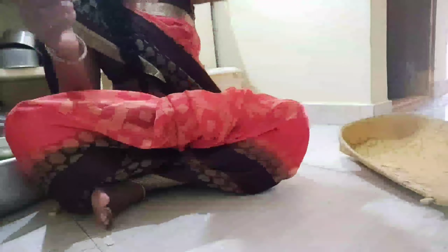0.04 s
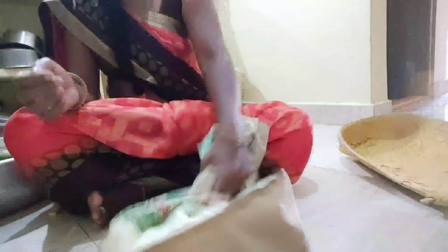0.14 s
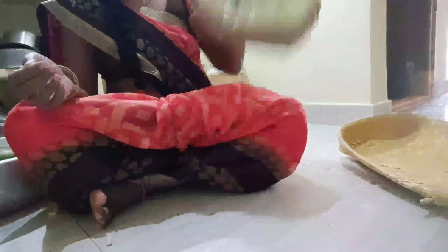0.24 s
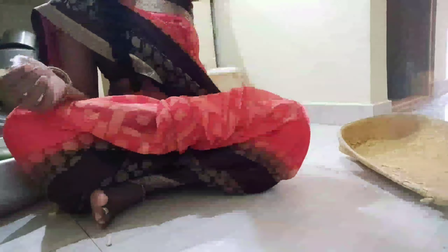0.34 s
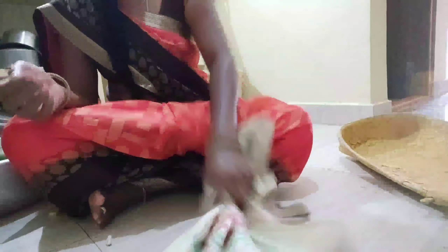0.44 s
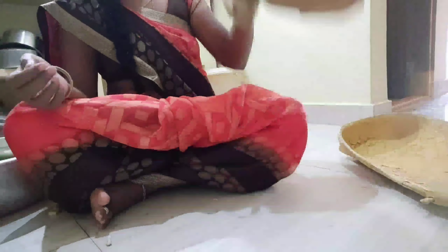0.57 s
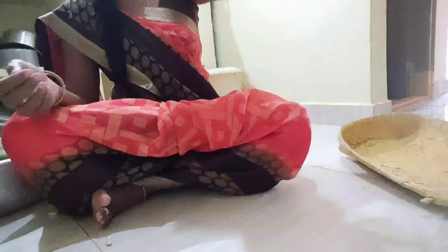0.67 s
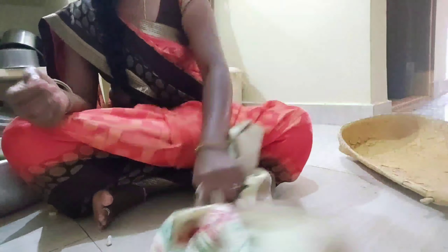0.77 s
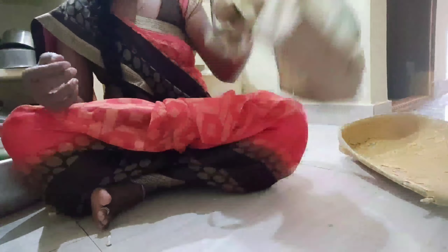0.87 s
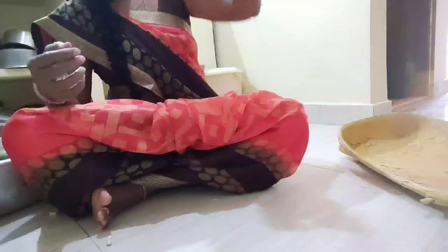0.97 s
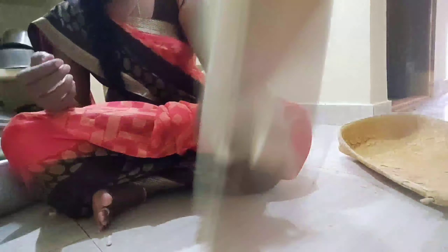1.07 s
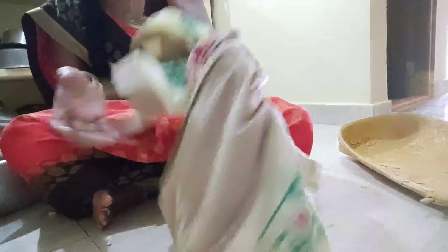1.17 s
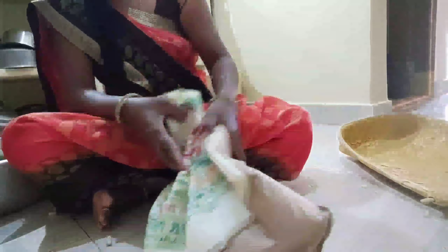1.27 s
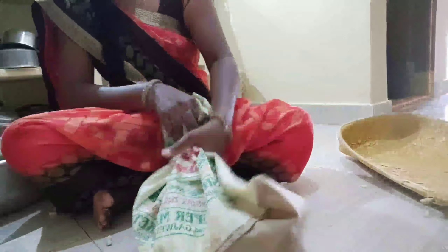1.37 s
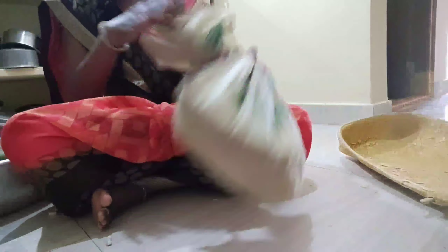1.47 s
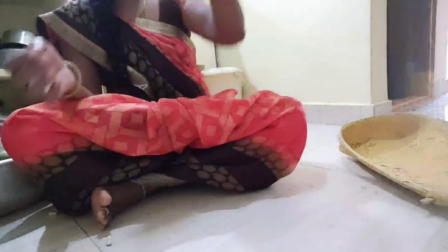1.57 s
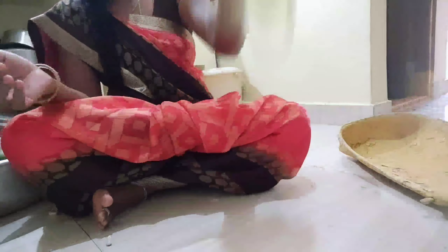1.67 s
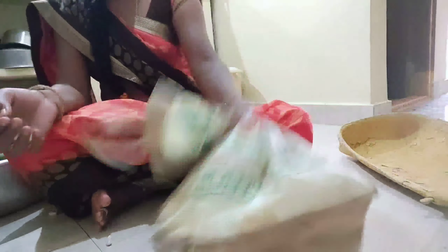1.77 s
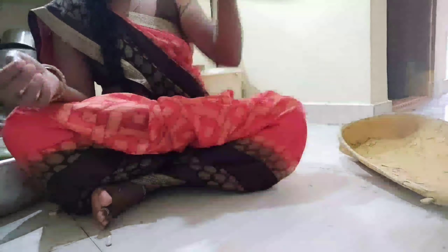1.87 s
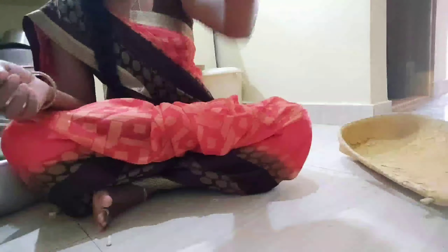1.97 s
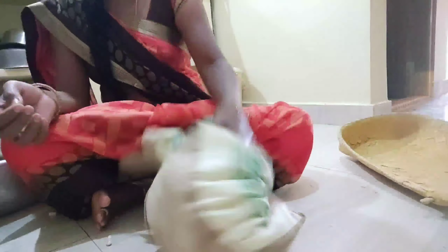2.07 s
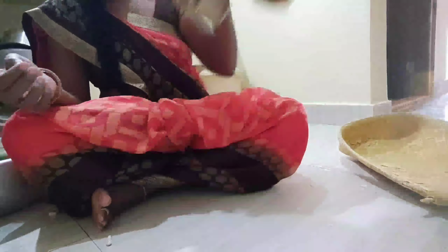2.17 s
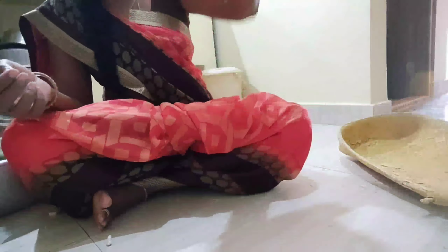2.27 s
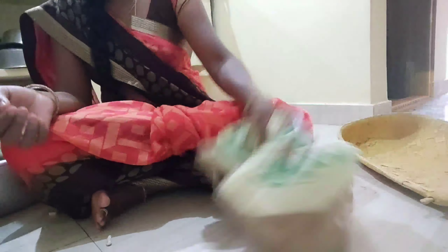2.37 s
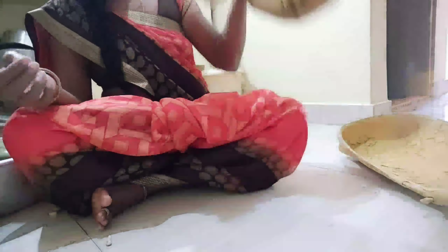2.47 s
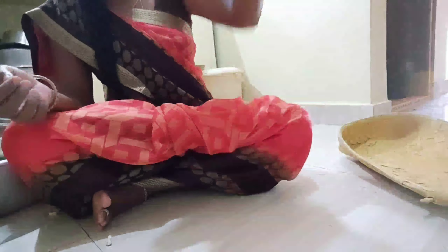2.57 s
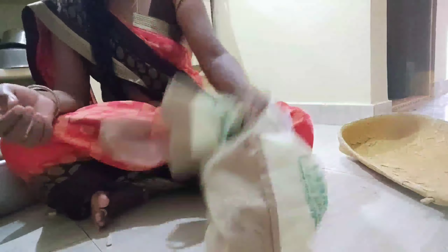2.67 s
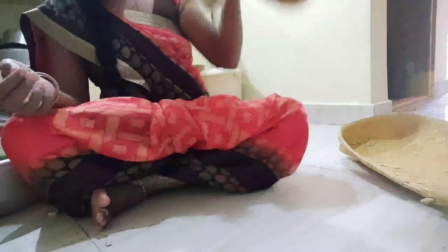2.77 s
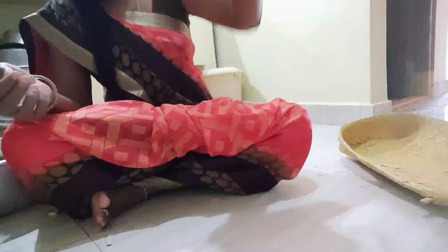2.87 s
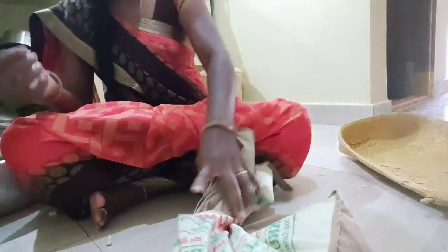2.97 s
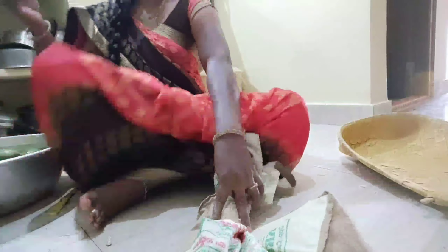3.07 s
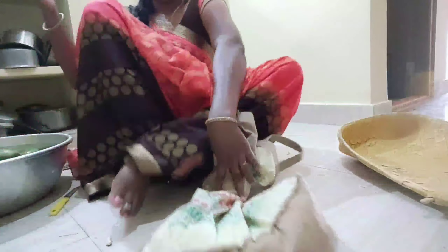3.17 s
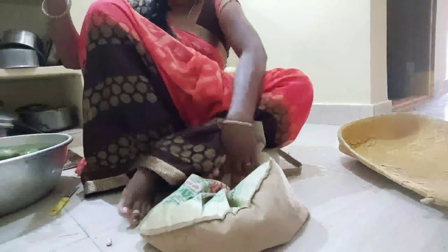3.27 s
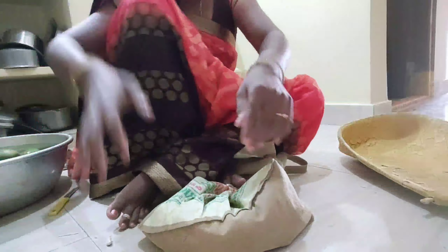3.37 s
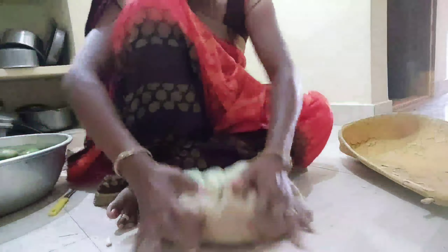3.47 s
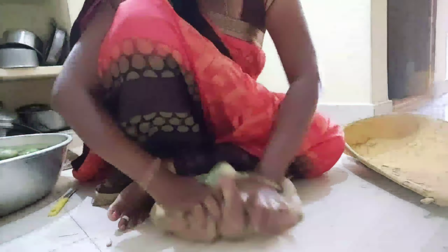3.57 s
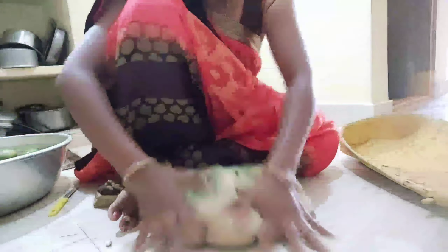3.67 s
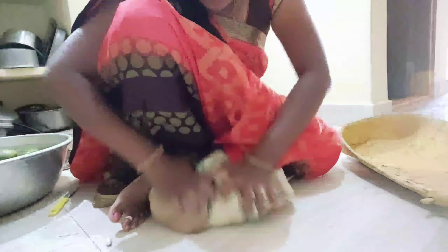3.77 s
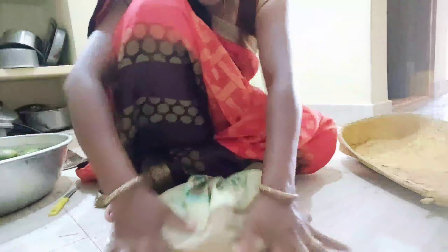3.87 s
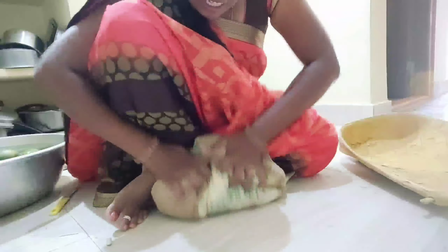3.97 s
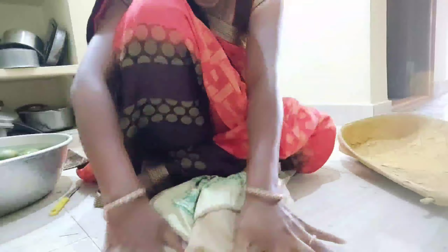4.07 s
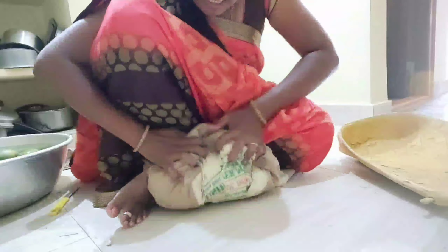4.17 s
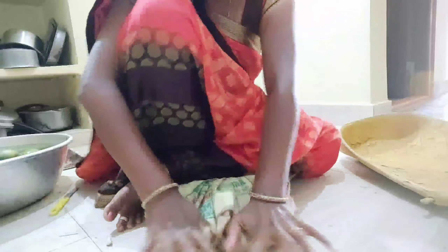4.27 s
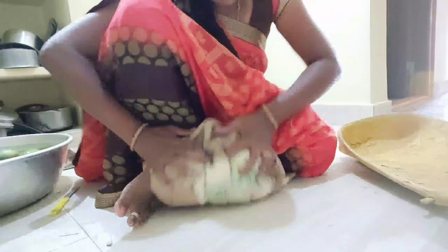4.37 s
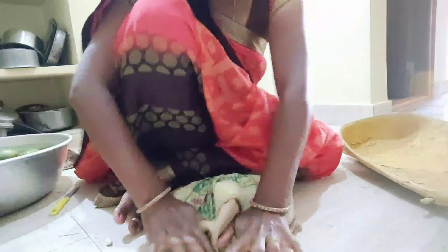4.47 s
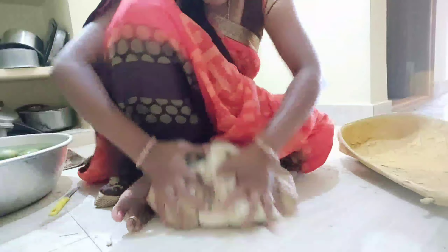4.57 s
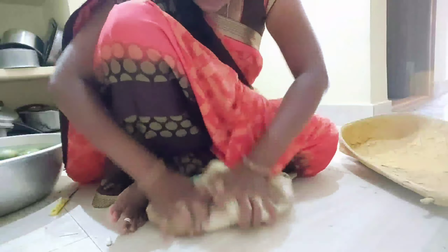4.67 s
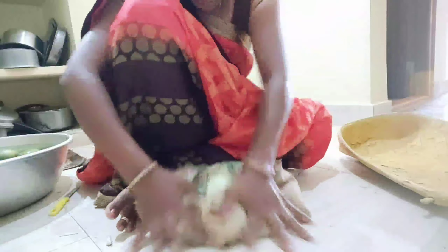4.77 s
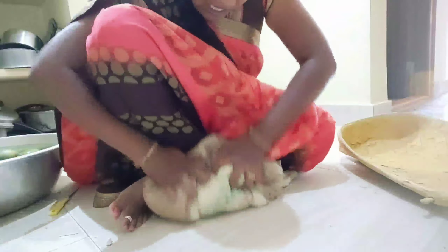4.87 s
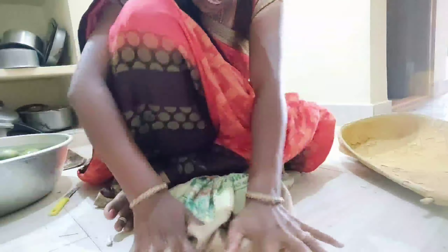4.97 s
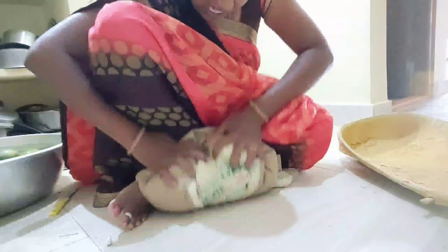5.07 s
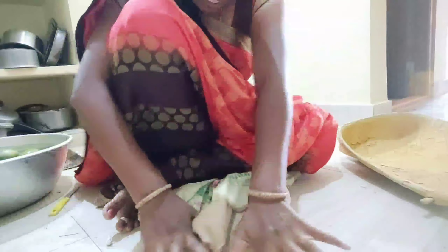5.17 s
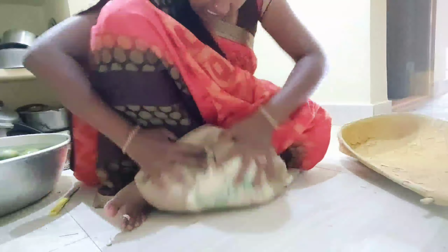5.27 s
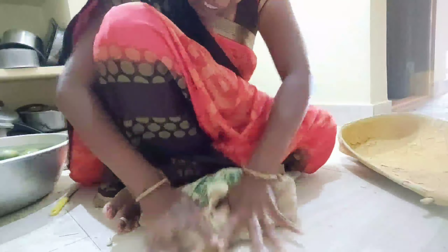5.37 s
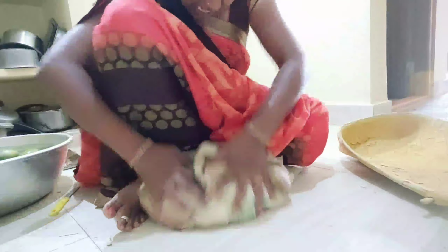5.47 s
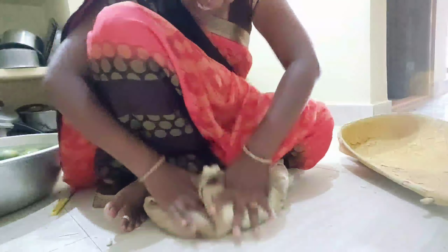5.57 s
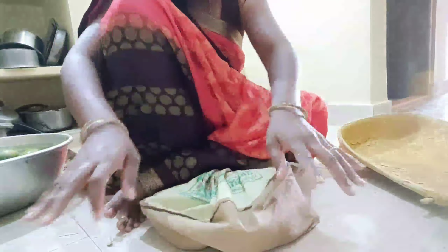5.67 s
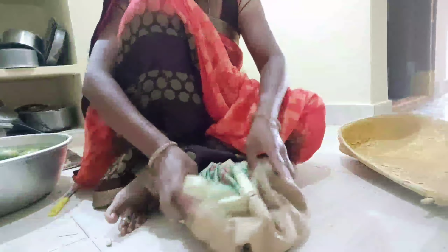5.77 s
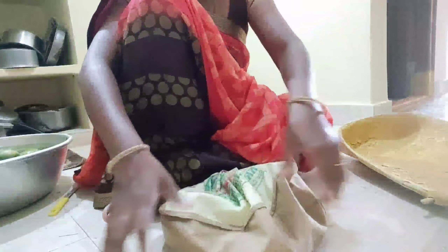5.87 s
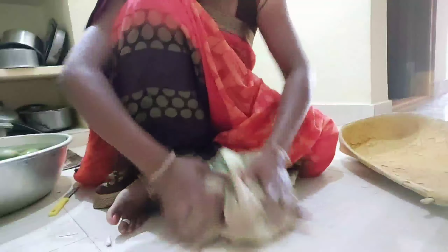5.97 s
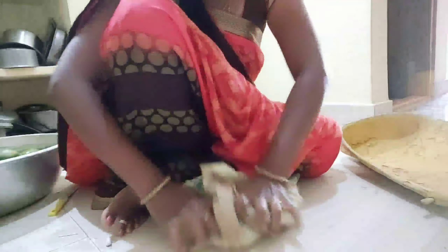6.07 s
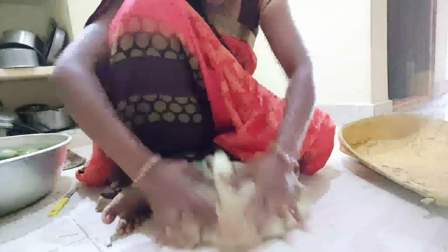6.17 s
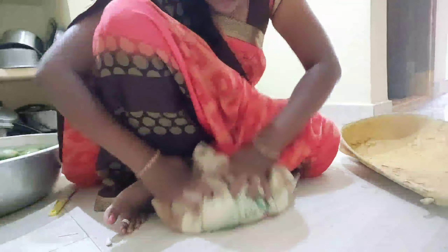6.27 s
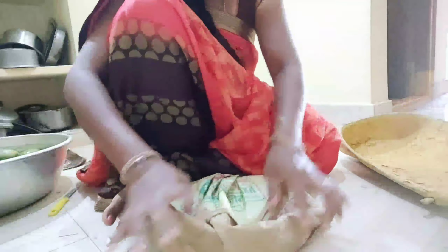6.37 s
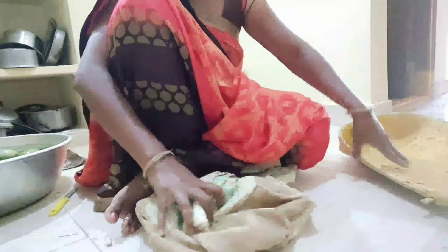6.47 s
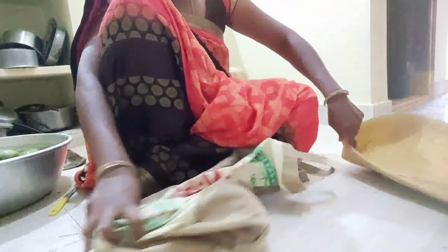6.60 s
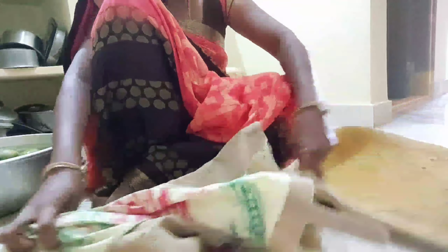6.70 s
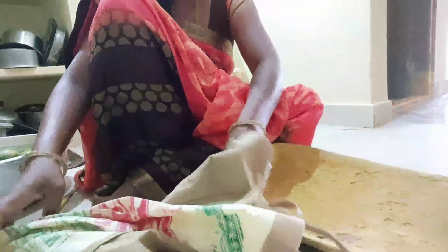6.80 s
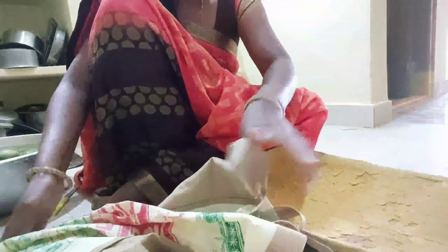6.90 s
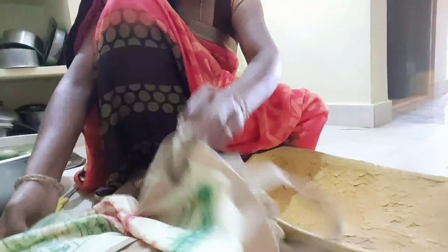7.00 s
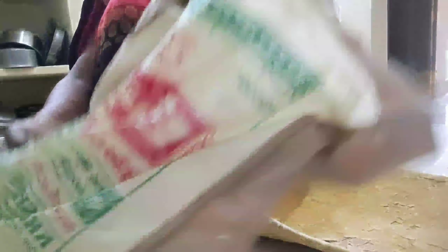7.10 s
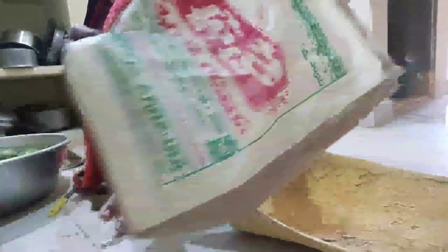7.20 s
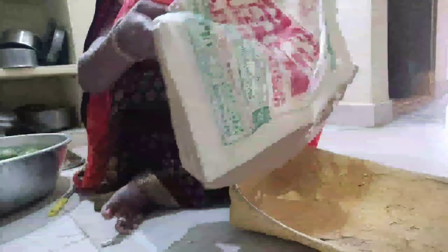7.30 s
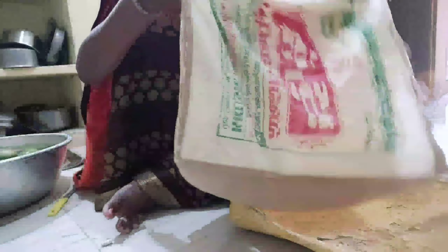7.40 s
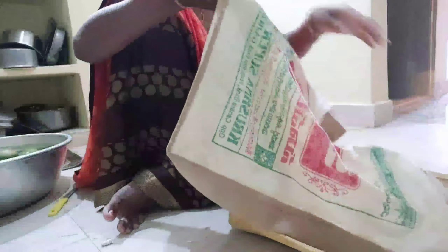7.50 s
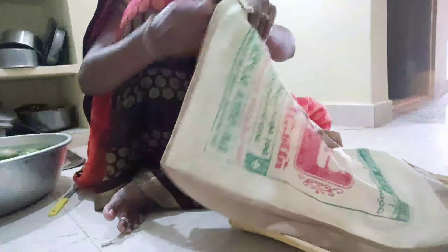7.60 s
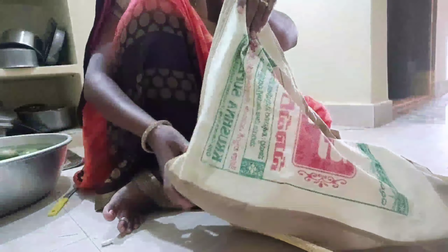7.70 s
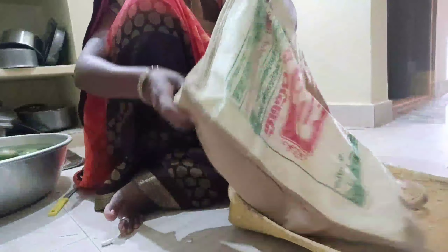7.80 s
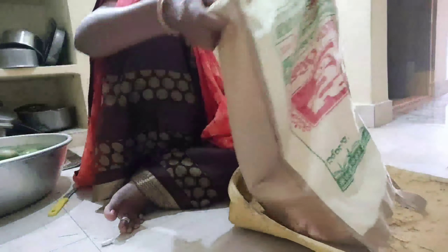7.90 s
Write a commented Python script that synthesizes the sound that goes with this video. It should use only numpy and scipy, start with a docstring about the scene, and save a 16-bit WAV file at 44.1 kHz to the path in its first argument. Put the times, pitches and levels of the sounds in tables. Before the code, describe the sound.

A woven sack of garlic cloves is handled on a tiled kitchen floor, close to a stereo microphone. Slams land at about 0.1, 0.5, 0.8, 1.1, 1.7, 2.1, 2.4, 2.7 and 2.95 seconds: a crackling cloth slap, hollow knocking cloves and a deep short floor thud, each slumping in under a tenth of a second. The sack is shuffled between 1.2 and 1.6; a hard tick marks the 1.75 hit, and a strong low air puff bumps the microphone near 2.1. It is nearly quiet from 3.1 to 3.45. Then quick rubbing, about nine strokes a second, rustles, scuffs and knocks until 6.4, with small skin snaps. A scraping drag at 6.7 leads to sparse rustles, lifting and soft tumbles on a wicker tray from 7 to 8, including a clearer clove knock near 7.55. Short wall reflections, faint room noise and hiss continue throughout.

```python
"""A kitchen with a tiled floor, heard close through the two ports of a stereo microphone. A woven sack of garlic
cloves is slammed down nine times, then rubbed to and fro with both hands, dragged and lifted. Shaped noise makes
the rustling cloth, scuffing weave and grinding cloves; resonances make the knocks, the thudding floor, the ticks
and the tumbling on a wicker tray. Air squeezed out by a slam sometimes puffs on a port. Short reflections from
the walls follow the near sounds, over steady room noise and microphone hiss."""
import sys
import numpy as np
from scipy import signal
from scipy.fft import rfft, irfft, next_fast_len
from scipy.io import wavfile
from scipy.ndimage import uniform_filter1d, map_coordinates

SR = 44100
rng = np.random.default_rng(int(sys.argv[2]) if len(sys.argv) > 2 else 0)


def transcribe(signal):
    """Save signal, clipped to [-1, 1], as a 16-bit WAV file at the path in sys.argv[1]."""
    frames = np.atleast_2d(signal).T
    limited = np.clip(frames, -1, 1)
    pcm = np.round(limited * 32767).astype(np.int16)
    wavfile.write(sys.argv[1], SR, pcm)


N = 350273  # length in samples

# All levels in the tables are relative: each source sets its own offset, and the ports colour the result.
# The sack lands, then slumps flat. Columns: landing_s, crackle_db, slap_db, smack_db, knock_db, thud_db, rise_s,
# slump_s, rustle_start_db, rustle_end_db, knocking_db (mid-slump), rumble_start_db, scuff_start_db,
# whip_db (rustle just before landing), rumble_change_db (over the slump)
SLAMS = [(0.1366, -29, -28.5, -52, -24.5, -15, 0.0042, 0.078, -46.5, -36.5, -41.5, -23.5, -38.5, -56, -4),
         (0.4637, -19, -20.5, -27, -18, -18.5, 0.0015, 0.081, -38, -41.5, -36.5, -31.5, -45, -46.5, -9),
         (0.7822, -17, -20, -18.5, -22, -16.5, 0.0037, 0.076, -34, -40, -38, -32, -36.5, -44, -7),
         (1.1147, -16, -22, -20, -20.5, -24.5, 0.0011, 0.086, -46, -44, -42.5, -34.5, -40, -47, -9.5),
         (1.7479, -17, -19.5, -19.5, -22.5, -24, 0.0015, 0.063, -45, -38, -36, -30, -43, -49, -10.5),
         (2.0528, -18.5, -22.5, -24.5, -28, -17.5, 0.0015, .07, -41.5, -42, -39, -31, -38, -46.5, -7.5),
         (2.356, -22.5, -24.5, -18.5, -22.5, -19, 0.0018, 0.073, -38.5, -40.5, -45, -32.5, -40, -45.5, -10.5),
         (2.6577, -20, -33, -23.5, -20.5, -17.5, 0.0025, 0.072, -44.5, -39, -45, -28, -36.5, -45.5, -9),
         (2.952, -22, -25, -24.5, -32.5, -33, 0.00096, 0.097, -38.5, -58, -48, -35.5, -43, -51, -14)]
# Single cloves knocking harder than the rest: time_s, level_db
CLOVE_KNOCKS = [(0.146, -24), (0.211, -33), (0.472, -15), (0.546, -15.5), (1.249, -20), (1.816, -32),
                (2.426, -22.5), (3.48, -35.5), (3.532, -29.5), (3.764, -25), (3.944, -27), (4.186, -30),
                (4.454, -40), (4.847, -31), (4.932, -28), (5.302, -29), (5.482, -33), (5.636, -32),
                (5.97, -39), (6.105, -27), (6.231, -40), (6.762, -43), (7.15, -33), (7.522, -30),
                (7.564, -18)]
# The loudest skins snapping: time_s, level_db
SKIN_SNAPS = [(3.479, -34), (3.5772, -30), (3.7928, -38), (4.056, -21), (4.123, -42), (4.7, -33),
              (4.846, -27), (4.9362, -32), (5.4804, -32), (5.9863, -35), (7.004, -37)]
# Dull bumps as the sack settles: time_s, level_db
SETTLING_BUMPS = [(0.176, -11), (0.201, -12), (2.074, -16), (3.003, -21), (6.646, -33), (7.152, -34),
                  (7.844, -52.5)]
# Hard ticks of a clove or bangle on tile: time_s, level_db
TILE_TICKS = [(0.177, -33), (0.544, -40), (1.249, -27.5), (1.751, -9.5), (1.764, -28), (2.953, -21.5),
              (3.479, -40), (3.841, -32.5), (4.739, -34.5), (4.849, -44), (4.936, -36), (5.194, -37),
              (5.204, -38), (5.48, -49), (5.639, -36), (5.971, -44), (6.446, -45), (6.748, -46),
              (7.004, -49), (7.523, -39.5), (7.568, -31.5)]
# Air puffs on the ports: time_s, level_db, pitch_hz, left_minus_right_db
AIR_PUFFS = [(.215, -38, 150, -14), (0.233, -25, 130, -16), (0.588, -32, 90, -24), (2.089, -8.5, 147, -32),
             (2.097, -5, 196, -32), (2.103, -7.5, 212, -3), (2.116, -21, 150, -24),
             (2.133, -17.5, 140, -25), (2.151, -21, 118, 29), (2.745, -21, 130, -28),
             (2.756, -38, 150, -16), (2.776, -28, 118, 22), (2.812, -39, 100, 18), (2.852, -67, 120, 17)]
# The sack is rubbed, dragged, shifted or lifted: start_s, length_s, fastest (0-1 of the length),
# cloves_most (0-1 of the length), rustle_db, scuff_db, grinding_db, knocking_db, rumble_db
HAND_STROKES = [(0.307, 0.26, 0.49, 0.5, -57.5, -71, -69, -60, -53),
                (1.214, 0.13, 0.54, 0.44, -43, -51, -51, -45, -52),
                (1.31, 0.15, 0.4, 0.53, -55, -60, -64, -51, -59),
                (1.414, 0.2, 0.3, 0.2, -48, -58, -58, -48, -56.5),
                (3.103, 0.2, 0.38, 0.3, -58, -60, -68, -70, -69),
                (3.242, 0.1, 0.4, 0.43, -63, -69, -63, -66, -70),
                (3.374, 0.097, 0.4, 0.51, -81, -79, -76, -56, -64),
                (3.461, 0.21, 0.25, 0.3, -45.5, -54.5, -62, -48, -54.5),
                (3.557, 0.12, 0.41, 0.42, -40.5, -46.5, -48, -50.5, -61),
                (3.647, 0.16, 0.54, 0.64, -45.5, -55, -59, -43.5, -57),
                (3.768, 0.13, 0.46, 0.59, -40.5, -46, -49.5, -47, -54.5),
                (3.858, 0.15, 0.6, 0.65, -43, -56, -53, -44, -52.5),
                (3.97, 0.15, 0.43, 0.33, -42, -48.5, -51.5, -46.5, -54.5),
                (4.088, 0.15, 0.53, 0.52, -45, -59, -54, -45, -55),
                (4.203, 0.14, 0.39, 0.35, -42.5, -48.5, -54, -49.5, -58),
                (4.318, 0.14, 0.5, 0.55, -45.5, -58, -53, -46, -55),
                (4.428, 0.12, 0.4, 0.3, -43, -48.5, -48.5, -49, -50.5),
                (4.533, 0.15, 0.53, 0.6, -47.5, -59, -53, -45, -59),
                (4.643, 0.14, 0.51, 0.5, -44.5, -48.5, -51, -51, -55),
                (4.751, 0.14, 0.59, 0.6, -46, -55, -56, -45, -55),
                (4.867, 0.16, 0.42, 0.39, -44, -53, -54, -51, -59),
                (4.981, 0.13, 0.62, 0.7, -47, -53, -51, -45.5, -61),
                (5.093, 0.15, 0.41, 0.58, -44, -52.5, -50, -45.5, -58),
                (5.21, 0.13, 0.6, 0.64, -48, -55, -59, -44, -54),
                (5.31, 0.16, 0.5, 0.46, -43.5, -52, -52, -50, -68),
                (5.448, 0.11, 0.54, 0.63, -46, -54.5, -58, -45.5, -60),
                (5.541, 0.14, 0.38, 0.57, -44, -51, -48.5, -47, -59.5),
                (5.728, 0.13, 0.51, 0.46, -50.5, -58, -58, -53, -58),
                (5.832, 0.077, 0.2, 0.13, -51, -62, -61, -54, -54),
                (5.961, 0.11, 0.49, 0.45, -45, -51, -57, -45, -56),
                (6.041, 0.15, 0.4, 0.34, -45, -48.5, -55, -48, -63),
                (6.159, 0.13, 0.46, 0.61, -46.5, -55.5, -56, -44.5, -56),
                (6.264, 0.14, 0.33, 0.44, -45, -51, -53.5, -49, -62),
                (6.437, 0.25, 0, 0, -59, -67, -60, -63, -72),
                (6.524, 0.17, 0.65, 0.67, -49, -53.5, -53.5, -57, -62),
                (6.67, 0.21, 0.36, 0.5, -41.5, -45.5, -58, -63, -68),
                (6.745, 0.11, 0.32, 0.21, -53, -47.5, -43.5, -54, -62),
                (6.991, 0.058, 0.37, 0.23, -51, -62, -53, -52, -55),
                (7.002, 0.17, 0.37, 0.34, -59.5, -75, -63, -58.5, -65),
                (7.091, 0.32, 0.25, 0.32, -50.5, -65, -65, -50, -50.5),
                (7.36, 0.22, 0.39, 0.37, -58.5, -66, -69, -56.5, -63),
                (7.464, 0.19, 0.59, 0.57, -48, -62, -49.5, -45, -53.5),
                (7.615, 0.11, 0.3, 0.34, -57.5, -67, -59, -55, -58),
                (7.69, 0.2, 0.48, 0.2, -56.5, -64, -60.5, -58, -60),
                (7.778, 0.24, 0.4, 0.42, -51, -53.5, -54, -51, -57)]
# Cloves tumble onto a wicker tray: start_s, length_s, densest (0-1 of the length), level_db
TRAY_TUMBLES = [(6.953, .11, 0.42, -57), (7.112, 0.22, 0.23, -48), (7.505, 0.11, 0.65, -45),
                (7.76, .25, 0.3, -65.5)]

# Next three, one entry a part: rustle, scuff, grinding, knocking, rumble
# Strength as hand speed to this power: power (no unit)
SPEED_POWER = [1.64, 1.63, 1.38, 1.55, .8]
# Each part against whip_db as the sack is whipped down: level_db
WHIP_PARTS = [-3, -8.5, -11, -5, -1]
# Each part while the sack swings in the air: level_db
SWING_PARTS = [-65, -82.5, -82, -89, -68.5]

# Noise spectrum of rustling cloth: pitch_hz, level_db (per Hz)
CLOTH_SPECTRUM = [(1470, -11.5), (2500, -3), (2680, -2), (4410, -6.5), (5870, -8.5), (8530, 0.5),
                  (10900, -5.5), (12400, -6), (14900, -4.5), (15600, -2.5), (16000, -54)]
# Noise spectrum of the scuffing weave: pitch_hz, level_db (per Hz)
WEAVE_SPECTRUM = [(820, -4.5), (1400, -3.5), (2020, -3.5), (2680, -8), (4500, -6), (5850, -27),
                  (9900, -120)]
# Noise spectrum of cloth slapping tile: pitch_hz, level_db (per Hz)
SLAP_SPECTRUM = [(820, -57), (1400, -15), (1780, -0.5), (2140, 2), (2450, 0.5), (2740, 1), (4470, -9),
                 (5000, -14), (6500, -35), (11000, -120)]
# Noise spectrum of cloves grinding on each other: pitch_hz, level_db (per Hz)
HEAP_SPECTRUM = [(320, -15), (550, -3), (611, -4.5), (673, -1.5), (776, -7), (1500, -8), (1950, -22),
                 (3300, -120)]
# Noise spectrum of the room: pitch_hz, level_db (per Hz)
ROOM_SPECTRUM = [(15, -39), (25, -11.5), (75, -5.5), (289, -9), (357, -9), (757, -14.5), (954, -15),
                 (1160, -16.5), (1350, -19), (2500, -22), (3250, -53), (5500, -120)]
# Noise spectrum of microphone hiss: pitch_hz, level_db (per Hz)
HISS_SPECTRUM = [(1470, -38), (2500, -3), (3980, -5.5), (4990, -6), (5740, -20), (6450, -6), (8270, -6),
                 (14900, -10.5), (16000, -25)]

# Resonances of air and cloves in the sack: pitch_hz, width_hz, level_db
SACK_MODES = [(341, 138, 4), (458, 102, 4), (561, 200, -3)]
# Resonances of floor and stand: pitch_hz, width_hz, level_db
FLOOR_MODES = [(98.7, 63, -5), (140.3, 27.7, 1.5), (173.2, 59.5, -5)]
# Resonances of a tick on tile: pitch_hz, width_hz, level_db
TICK_MODES = [(770, 210, 4.5), (2200, 2500, -7)]
# Resonances of the wicker tray: pitch_hz, width_hz, level_db
TRAY_MODES = [(204, 64, 4.5), (483, 140, -4)]

# Likeness of left and right: pitch_hz, correlation (-1 to 1)
PORT_LIKENESS = [(60, 0.93), (110, 0.98), (200, 0.9), (380, 0.89), (700, 0.59), (1290, 0.22), (2380, 0.17),
                 (4400, -0.0082), (8120, -0.033), (15000, -0.091)]
# Difference in colour between the ports: pitch_hz, left_minus_right_db
PORT_COLOUR = [(60, 2), (95, 0.5), (150, 0.0), (240, 0.5), (380, 0.5), (600, -1), (950, 0), (1500, 1.5),
               (2380, 0.5), (3770, 0), (5980, 2), (9470, -2.5), (15000, 5.5)]
# Decay of the wall reflections: pitch_hz, t60_s
WALL_DECAY = [(100, 0.24), (400, 0.27), (2000, 0.32), (12000, 0.33)]

(LANDING_S, CRACKLE_DB, SLAP_DB, SMACK_DB, KNOCK_DB, THUD_DB, RISE_S, SLUMP_S, RUSTLE_START_DB, RUSTLE_END_DB,
 KNOCKING_DB, RUMBLE_START_DB, SCUFF_START_DB, WHIP_DB, RUMBLE_CHANGE_DB) = np.transpose(SLAMS)
ROOM_DB, HISS_DB, WALLS_DB = -59.5, -65.5, -15.5
TOP_HZ = 15750  # upper band limit
SLUMP_RISE_S, SWING_END_S = 0.01, 3.3
SCUFF_FADE, WHIP_RISE = 205, 247  # dB/s: scuff during the slump; swell before a landing
CLOTH_REST_FADE, CLOVE_REST_FADE, RUMBLE_REST_FADE = 440, 580, 216  # dB/s once the sack lies still
SLUMP_GRIND_DB = -9.5  # against the slump's rustle


def amp(db):
    """Decibels to amplitude."""
    return 10 ** (np.asarray(db) / 20)


def unit(x):
    """Scale to rms 1."""
    return x / np.sqrt(np.mean(x ** 2) + 1e-20)


def along(points, hz):
    """Read (pitch_hz, value) points on a log pitch axis."""
    f, v = np.transpose(points)
    return np.interp(np.log(hz + 1), np.log(f + 1), v)


def wobble(rate):
    """A smooth random curve with rate knots a second."""
    knots = rng.standard_normal(int(N * rate / SR) + 4)
    return map_coordinates(knots, [np.arange(N) * rate / SR])


def grainy(rate, depth_db):
    """Uneven contact: a random gain of rms 1 with rate knots a second."""
    return unit(amp(depth_db * wobble(rate)))


def filtered(x, response):
    """Apply a complex response of frequency."""
    m = next_fast_len(N + SR // 2)
    hz = np.fft.rfftfreq(m, 1 / SR)
    return irfft(rfft(x, m) * response(hz), m)[..., :N]


def colour(points):
    """The response of a noise spectrum."""
    return lambda hz: amp(along(points, hz))


def resonant(modes):
    """The summed response of damped resonances with alternating sign."""
    def response(hz):
        total = 0
        for k, (centre, width, db) in enumerate(modes):
            damping = 1j * hz * width
            total = total + (-1) ** k * amp(db) * damping / (centre ** 2 - hz ** 2 + damping)
        return total
    return response


def port_weights(hz):
    """Shares of mid and side noise that give the ports their likeness at each pitch."""
    half_angle = np.arccos(np.clip(along(PORT_LIKENESS, hz), -1, 1)) / 2
    return np.array([np.cos(half_angle), np.sin(half_angle)])


def patchy(depth_db):
    """Two noises whose loudness wanders in shared patches of pitch and time."""
    z = signal.stft(rng.standard_normal((2, N)), nperseg=256)[2]
    field = uniform_filter1d(rng.standard_normal(z.shape[1:]), size=4, axis=0)
    field = uniform_filter1d(field, size=8, axis=1)
    return unit(signal.istft(z * amp(depth_db * unit(field)), nperseg=256)[1][:, :N])


def excite(strength, response, patchy_db):
    """Noise under a strength curve drives a response of power gain 1; the ports share bass, not treble."""
    gain = np.sqrt(np.mean(abs(response(np.linspace(1, SR / 2, num=8192))) ** 2))
    noise = strength * patchy(patchy_db)
    mid, side = filtered(noise, lambda hz: response(hz) / gain * port_weights(hz))
    return np.array([mid + side, mid - side])


def bursts(times, dbs, rise, t60):
    """Strength of blows that swell over about rise seconds and die away."""
    after = np.maximum(np.arange(N) / SR - np.asarray(times)[:, None], 0)
    decay = amp(np.asarray(dbs)[:, None] - 60 * after / t60)
    return np.sum(decay * (1 - np.exp(-(after / rise) ** 2)), axis=0)


def scattered(rate, spread_db, t60):
    """Small random blows, rate a second on average, a few much harder than the rest."""
    blows = (rng.random(N) < rate / SR) * amp(spread_db * rng.exponential(size=N))
    return unit(signal.lfilter([1], [1, -amp(-60 / (t60 * SR))], blows))


def strike(times, dbs, response, contact):
    """One soft push of contact seconds a blow rings the response; a lone blow peaks at its level."""
    push = np.hanning(round(contact * SR))
    samples = np.round(np.append(times, N / SR) * SR).astype(int)  # a silent last blow sets the length
    blows = np.bincount(samples, np.append(-amp(dbs), 0))[:N]
    peak = abs(filtered(np.pad(push, (0, N)), response)).max()
    return filtered(np.convolve(blows, push)[:N], response) / peak


def arches(start, length, crest, db, power):
    """Power of movements that speed up and slow down like a half sine with a shifted crest."""
    t, total = np.arange(N) / SR, np.zeros(N)
    for s, span, top, level in zip(start, length, np.clip(crest, .04, .96), db):
        progress = np.clip((t - s) / span, 0, 1)
        speed = abs(np.sin(np.pi * progress ** (np.log(.5) / np.log(top))))
        total += (amp(level) * speed ** power) ** 2
    return total


def kitchen():
    """Gently unsteady noise of the room and hiss of the microphone."""
    room = amp(ROOM_DB) * excite(grainy(3.95, 0.53), colour(ROOM_SPECTRUM), 1.5)
    hiss = amp(HISS_DB) * excite(grainy(2.7, 0.77), colour(HISS_SPECTRUM), 0.39)
    return room + hiss


def walls(x):
    """Reflections as decaying noise: each pitch dies at its own speed, the bass alike at both ports."""
    hz, t, z = signal.stft(rng.standard_normal((2, SR // 2)), SR, nperseg=256)
    mid, side = z * port_weights(hz)[:, :, None]
    decay = amp(-60 * t / along(WALL_DECAY, hz)[:, None])
    tail = signal.istft(np.array([mid + side, mid - side]) * decay, SR, nperseg=256)[1]
    return signal.fftconvolve(x, tail / np.linalg.norm(tail[0]), axes=1)[:, :N]


def puffs():
    """Each eddy pushes the membrane once, with a pull before and after."""
    out, t = np.zeros((2, N)), np.arange(-1024, 1024) / SR
    for s, db, hz, pan_db in AIR_PUFFS:
        u = (np.pi * hz * t) ** 2
        ports = amp(db + np.minimum([[pan_db], [-pan_db]], 0))  # only the weaker port is turned down
        first = round(s * SR) - 1024
        out[:, first:first + len(t)] += ports * (1 - 2 * u) * np.exp(-u)
    return out


def tray():
    """Tumbling cloves drum unevenly on the resonances of the wicker."""
    tumbling = np.sqrt(arches(*np.transpose(TRAY_TUMBLES), 1.6))
    return excite(grainy(50, 3.3) * tumbling, resonant(TRAY_MODES), 1.7)


def ticks():
    """A sharp push and a short scratch ring the tile for each tick."""
    s, db = np.transpose(TILE_TICKS)
    push = strike(s, db, resonant(TICK_MODES), 0.00036)
    return push + excite(bursts(s, db - 8, 0.00058, 0.016), resonant(TICK_MODES), 2.8)


def floor(hz):
    """The response of the heavy floor: it rings low and passes little above or below its modes."""
    lowpass = 1 / (1 + 1.2j * hz / 210 - (hz / 210) ** 2)
    highpass = hz / (hz - 70j)
    return resonant(FLOOR_MODES)(hz) * lowpass * highpass


def slumps(start_db, change_db, rest_fade):
    """Power after each landing: it drifts by change_db while the sack slumps, then dies."""
    t = np.arange(N) / SR - LANDING_S[:, None]
    slump = SLUMP_S[:, None]
    db = start_db[:, None] + change_db[:, None] * np.clip(t / slump, 0, 1)
    db -= rest_fade * np.maximum(t - slump, 0)
    return np.sum((amp(db) * np.clip(t / SLUMP_RISE_S, 0, 1)) ** 2, axis=0)


def handling():
    """Strength of the five parts as the sack swings, is whipped down, slumps and is stroked; powers add."""
    t = np.arange(N) / SR
    start, length, fastest, cloves_most, *levels = np.transpose(HAND_STROKES)
    crests = [fastest, fastest, cloves_most, cloves_most, fastest]
    stroked = [arches(start, length, crest, db, power)
               for crest, db, power in zip(crests, levels, SPEED_POWER)]
    change_db = RUSTLE_END_DB - RUSTLE_START_DB
    slumped = [slumps(RUSTLE_START_DB, change_db, CLOTH_REST_FADE),
               slumps(SCUFF_START_DB, -SCUFF_FADE * SLUMP_S, CLOTH_REST_FADE),
               slumps(RUSTLE_START_DB + SLUMP_GRIND_DB, change_db, CLOVE_REST_FADE),
               slumps(KNOCKING_DB - change_db / 2, change_db, CLOVE_REST_FADE),
               slumps(RUMBLE_START_DB, RUMBLE_CHANGE_DB, RUMBLE_REST_FADE)]
    until = LANDING_S[:, None] - t
    whip = np.sum((until > 0) * amp(WHIP_DB[:, None] - WHIP_RISE * abs(until)) ** 2, axis=0)
    swing = np.clip((SWING_END_S - t) / 0.03, 0, 1) * grainy(12, 4.1) ** 2
    return [np.sqrt(stroke + slump + amp(whip_db) ** 2 * whip + amp(swing_db) ** 2 * swing)
            for stroke, slump, whip_db, swing_db in zip(stroked, slumped, WHIP_PARTS, SWING_PARTS)]


def floor_thuds(rumble):
    """Landings and settling bumps push the floor's modes; rolling contact rumbles in them."""
    bump, bump_db = np.transpose(SETTLING_BUMPS)
    strength = grainy(30, 1.3) * rumble + bursts(LANDING_S, THUD_DB - 2.5, 0.00064, 0.023)
    pushes = strike(LANDING_S, THUD_DB - 1.5, floor, 0.0015) + strike(bump, bump_db - 11, floor, 0.0033)
    return excite(strength, floor, 0.071) + pushes


def clove_knocks(knocking):
    """Cloves knock on each other and ring the air and cloves in the sack."""
    clove, clove_db = np.transpose(CLOVE_KNOCKS)
    modes = resonant(SACK_MODES)
    strength = grainy(60, 3.8) * knocking + bursts(LANDING_S, KNOCK_DB + .1, 0.0022, 0.064)
    strength += bursts(clove, clove_db - 8, 0.0044, 0.037)
    pushes = strike(LANDING_S, KNOCK_DB + 1.5, modes, 0.0011) + strike(clove, clove_db - 10, modes, 0.0014)
    return excite(strength, modes, 1.9) + pushes


def clove_grinding(grinding, contact):
    """Cloves rub on each other in the heap and smack together at each landing."""
    smacks = bursts(LANDING_S, SMACK_DB + .1, RISE_S[:, None], 0.058)
    return excite(contact * grainy(60, 1.9) * grinding + smacks, colour(HEAP_SPECTRUM), 1.4)


def weave_scuff(scuff, contact):
    """The weave drags in uneven contact, with grit catching in it."""
    scuff = scuff * (1 + amp(-13.5) * scattered(250, 2.8, 0.0061))
    return excite(contact * grainy(40, 0.79) * scuff, colour(WEAVE_SPECTRUM), 2.3)


def cloth_slaps(contact):
    """Cloth slaps the tile at each landing as a short burst of noise."""
    slap = contact * bursts(LANDING_S, SLAP_DB + .1, RISE_S[:, None], 0.054)
    return excite(slap, colour(SLAP_SPECTRUM), 0.64)


def cloth_hiss(rustle, contact):
    """Cloth and skins rustle, crackle at each landing and snap."""
    snap, snap_db = np.transpose(SKIN_SNAPS)
    crackle = bursts(LANDING_S, CRACKLE_DB + 0.5, RISE_S[:, None], 0.054)
    hiss = contact * (rustle + crackle) + bursts(snap, snap_db - 11, 0.00043, 0.013)
    hiss += amp(-19) * rustle * scattered(40, 3.5, 0.013)  # lesser snaps
    return excite(hiss, colour(CLOTH_SPECTRUM), 1.9)


def sack():
    """Slams and handling drive cloth, weave, cloves and floor together."""
    rustle, scuff, grinding, knocking, rumble = handling()
    contact = grainy(90, 0.98) * grainy(700, 0.81)  # fibres catch and let go, shared by four sources
    cloves = clove_knocks(knocking) + clove_grinding(grinding, contact)
    cloth = weave_scuff(scuff, contact) + cloth_slaps(contact) + cloth_hiss(rustle, contact)
    return floor_thuds(rumble) + cloves + cloth


def scene():
    """Near sounds and their reflections over the kitchen's noise; puffs act on the ports directly."""
    near = tray() + ticks() + sack()
    return kitchen() + amp(WALLS_DB) * walls(near) + puffs() + near


def record(dry):
    """The two ports differ in colour; nothing above the band limit is kept."""
    def ports(hz):
        half_difference_db = np.outer([.5, -.5], along(PORT_COLOUR, hz))
        return amp(half_difference_db) * (hz < TOP_HZ)
    return filtered(dry, ports)


dry = scene()
out = record(dry)
transcribe(out)
```